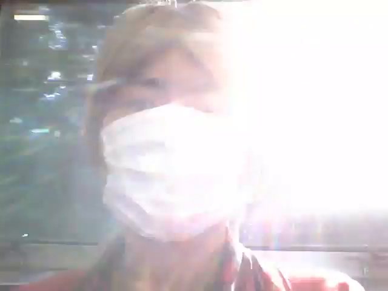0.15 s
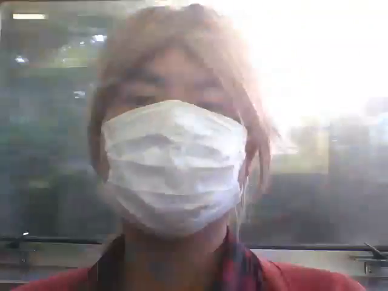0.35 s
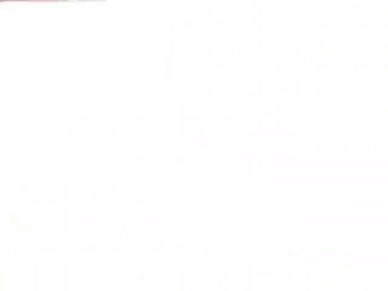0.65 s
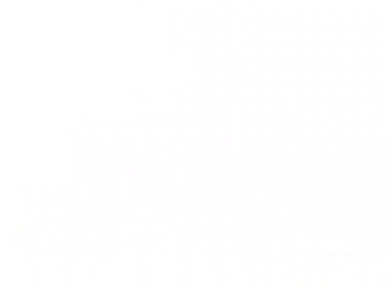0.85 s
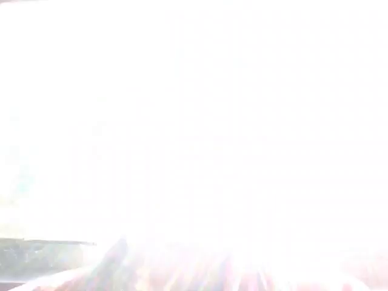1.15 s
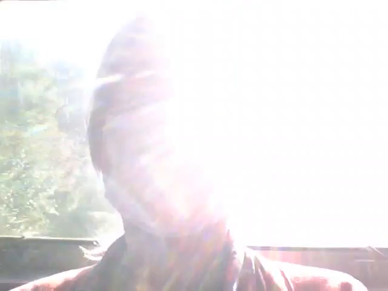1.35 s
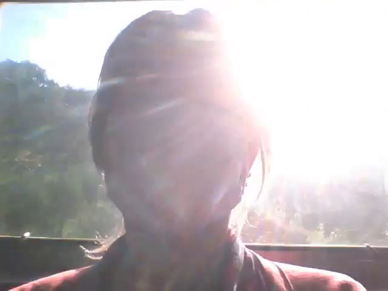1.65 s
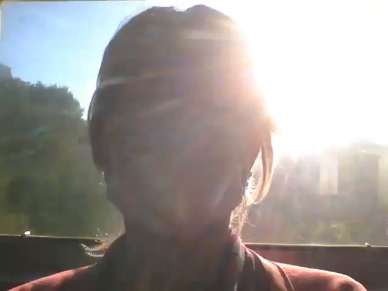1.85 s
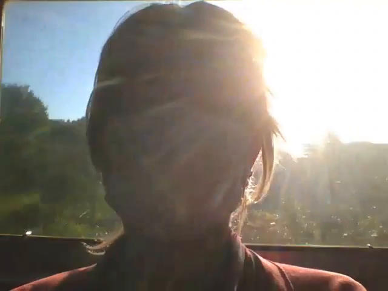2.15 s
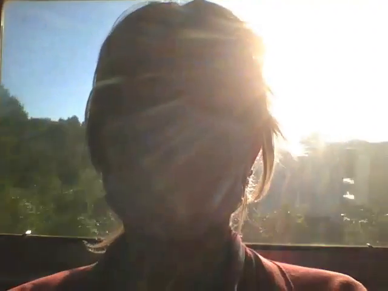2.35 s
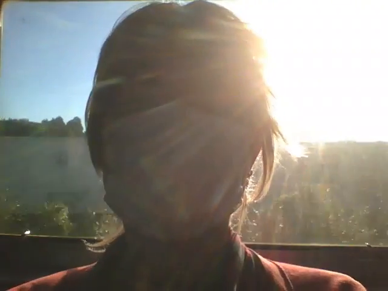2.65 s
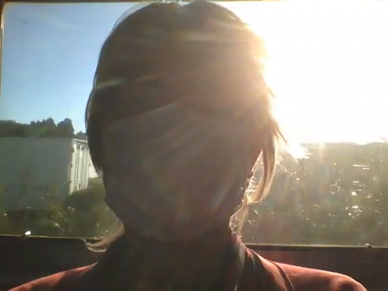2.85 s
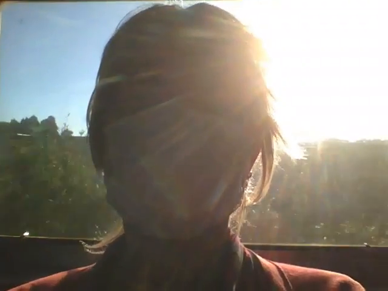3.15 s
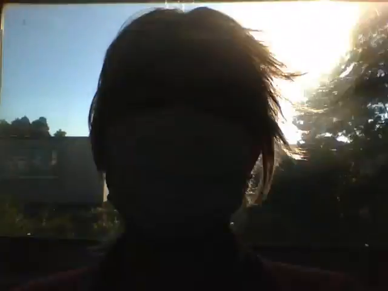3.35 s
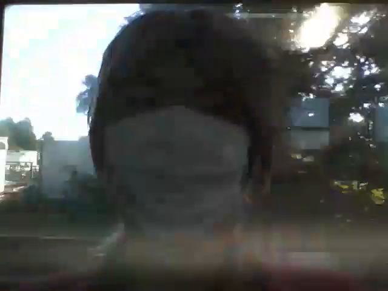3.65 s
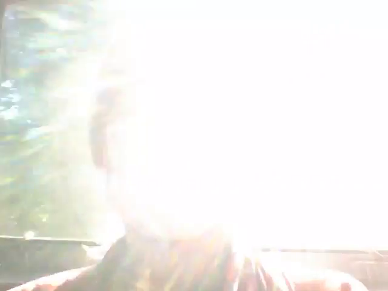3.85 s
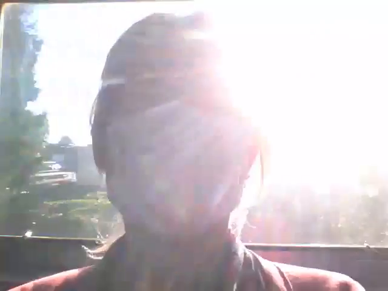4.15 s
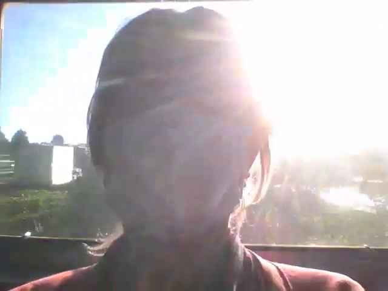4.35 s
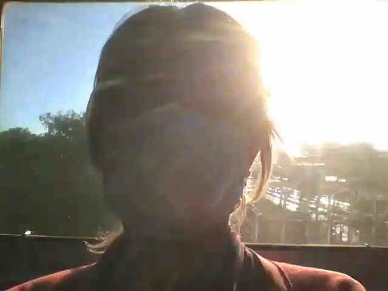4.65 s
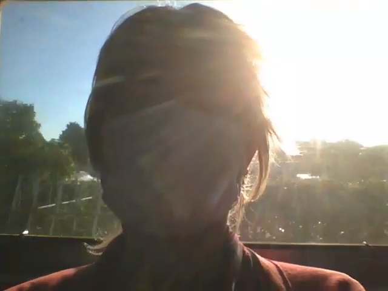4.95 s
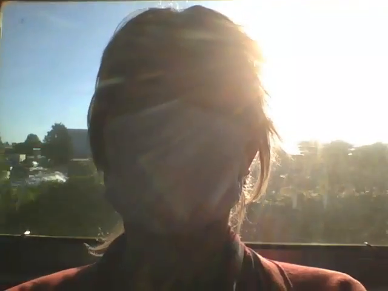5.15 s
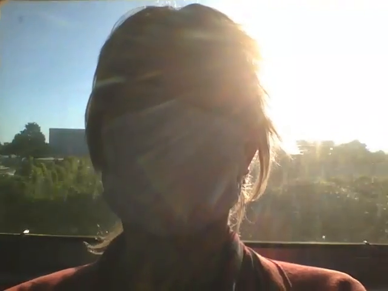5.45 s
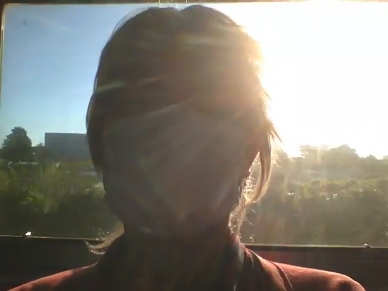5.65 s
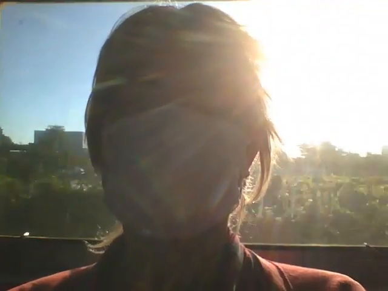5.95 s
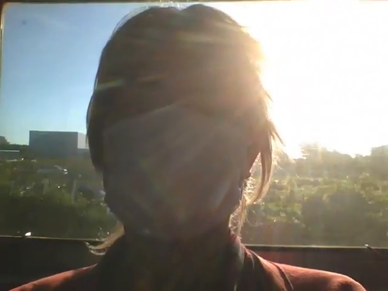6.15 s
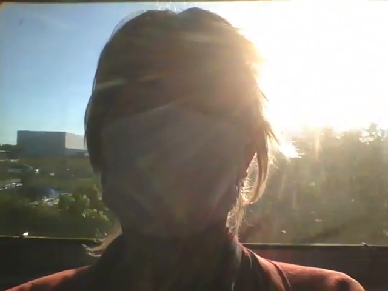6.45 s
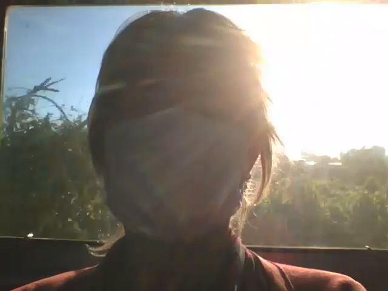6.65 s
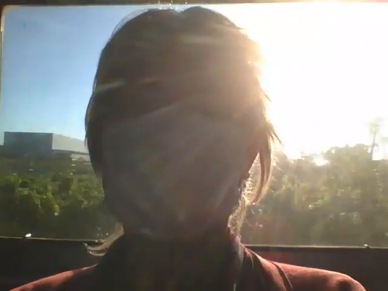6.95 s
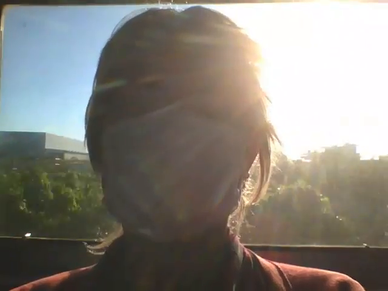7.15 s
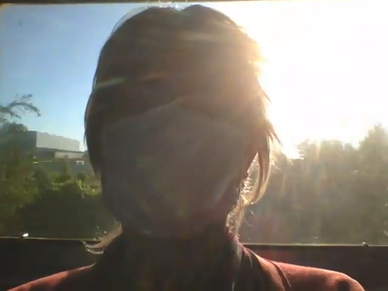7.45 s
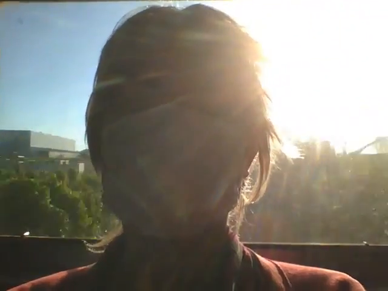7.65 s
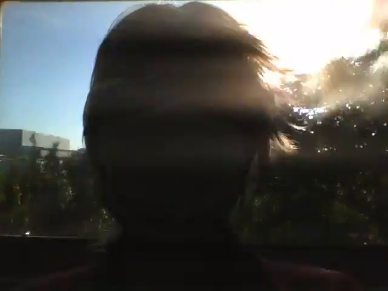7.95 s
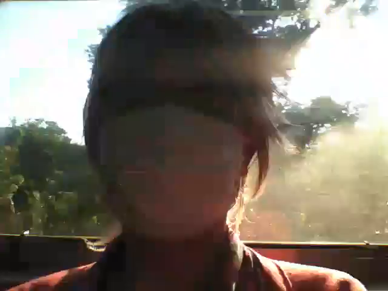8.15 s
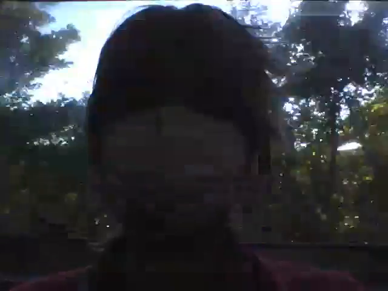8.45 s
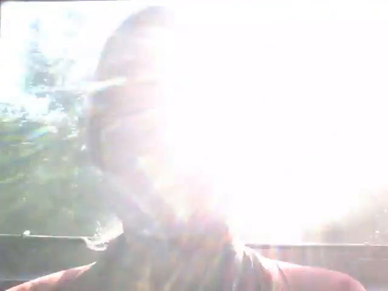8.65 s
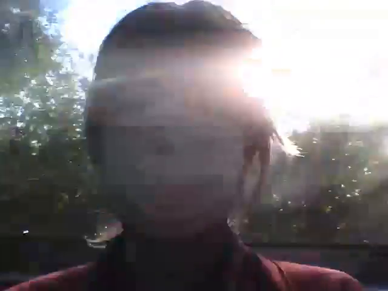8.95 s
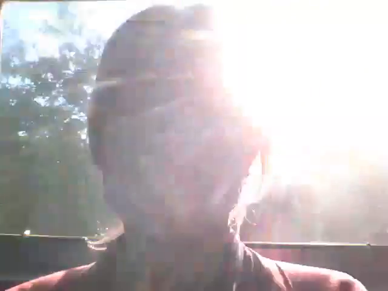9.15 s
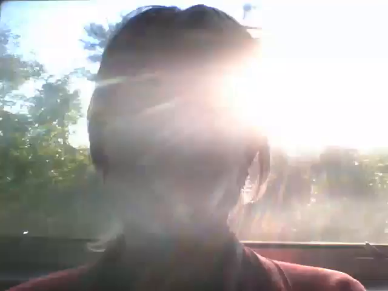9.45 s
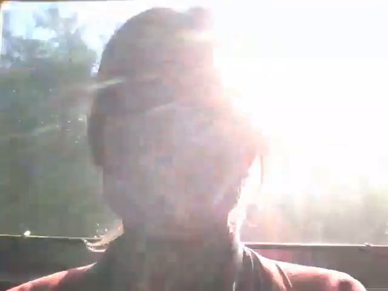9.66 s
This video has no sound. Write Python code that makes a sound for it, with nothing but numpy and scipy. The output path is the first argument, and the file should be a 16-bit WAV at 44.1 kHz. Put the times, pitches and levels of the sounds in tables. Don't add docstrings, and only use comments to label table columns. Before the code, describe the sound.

Inside a moving diesel railcar by an open window: a deep, lumpy boom, rolling wheel roar, irregular rail-joint knocks and hissing wind.

```python
import sys
import numpy as np
from scipy import signal
from scipy.fft import rfft, irfft
from scipy.io import wavfile
from scipy.ndimage import uniform_filter1d, minimum_filter1d

SR = 44100
rng = np.random.default_rng(int(sys.argv[2]) if len(sys.argv) > 2 else 0)


def field_ratio(decibels):
    return 10 ** (np.asarray(decibels, dtype=float) / 20)


def store_pcm(level_fs):
    pcm = np.round(np.clip(level_fs, -1, 1) * 32767).astype(np.int16)
    wavfile.write(sys.argv[1], SR, np.atleast_2d(pcm).T)


N = 432180


def unit(x):
    return x / np.sqrt(np.mean(x ** 2) + 1e-20)


def in_time(rows):
    s, *columns = np.transpose(rows)
    return [np.interp(np.arange(N) / SR, s, column) for column in columns]


def bumps(rows, column=1):
    out = np.zeros(N)
    for row in rows:
        span = max(int(row[2] * SR), 3)
        start = int(row[0] * SR) - span // 2
        where = np.arange(max(start, 0), min(start + span, N))
        shape = np.hanning(span) ** 0.98
        out[where] += row[column] * shape[where - start]
    return out


def drift(rate):
    coarse = 40
    r = np.exp(-2 * np.pi * rate * coarse / SR)
    noise = rng.standard_normal(N // coarse + 2002)
    slow = signal.lfilter([1], [1, -2 * r, r * r], noise)[2000:]
    return np.interp(np.arange(N) / coarse, np.arange(len(slow)), unit(slow - slow.mean()))


def resonate(x, hz, width_hz):
    r = np.exp(-np.pi * width_hz / SR)
    poles = [1, -2 * r * np.cos(2 * np.pi * hz / SR), r * r]
    return signal.lfilter(np.array([1, 0, -1]) * (1 - r * r) / 2, poles, x)


def resonant_noise(hz, width_hz):
    once = resonate(rng.standard_normal(N), hz, width_hz)
    return unit(resonate(once, hz, width_hz))


def coloured(spectrum, patchy_db, flicker_rate):
    hz, level_db = np.transpose(spectrum)
    grid = np.arange(N // 2 + 1) * SR / N + 1e-3
    shaped = rfft(rng.standard_normal(N)) * field_ratio(np.interp(np.log(grid), np.log(hz), level_db))
    place = 3 * np.log2(grid)
    out = 0
    for centre in range(int(3 * np.log2(hz[0])), int(3 * np.log2(hz[-1])) + 2):
        share = np.clip(1 - np.abs(place - centre), 0, 1)
        out = out + irfft(shaped * share, N) * field_ratio(patchy_db * drift(flicker_rate))
    return unit(out)


# centre in seconds, rise in dB, length in seconds.
TREES_PASSING = [
    (2.6, 14, 7.5),
    (3.62, 14, 0.68),
    (4.05, 7, .4),
    (6.49, 14, .28),
    (5.75, 6, .3),
]


def foliage():
    band = signal.butter(2, [5470, 7650], "band", fs=SR, output="sos")
    hiss = unit(signal.sosfilt(band, rng.standard_normal(N)))
    return field_ratio(-68.5 + bumps(TREES_PASSING)) * hiss


# frequency in Hz, density in dB per Hz.
AIR_SPECTRUM = [(2000, -14), (3400, -3.5), (4420, -0.5), (5940, -3), (6700, -7), (7950, -31), (10300, -56),
                (17500, -120)]


def window_air(roll_db, draught_db):
    return field_ratio(roll_db - 16.5 + draught_db) * coloured(AIR_SPECTRUM, patchy_db=1.0, flicker_rate=32)


# frequency in Hz, density in dB per Hz.
TRACK_SPECTRUM = [(820, 0.5), (1400, -0.5), (1520, -7), (1800, -2), (2380, -2), (3400, -9.5), (4420, -28),
                  (7480, -120)]


def track_noise(roll_db, draught_db):
    level_db = roll_db - 11 + 0.44 * draught_db
    return field_ratio(level_db) * coloured(TRACK_SPECTRUM, patchy_db=1.0, flicker_rate=17)


# start in seconds, pitch in Hz, level in dB.
FITTING_PINGS = [
    (1.535, 1790, -34),
    (3.775, 1705, -28),
    (5.545, 885, -30),
    (5.85, 3050, -38),
    (8.81, 2350, -36),
    (9.035, 2380, -35),
    (8.885, 1810, -36),
]


def pings():
    age = np.arange(int(.15 * SR)) / SR
    t60_s = 0.097
    out = np.zeros(N + len(age))
    for s, hz, db in FITTING_PINGS:
        envelope = field_ratio(db - 60 * age / t60_s) * np.tanh(age / .004)
        start = int(s * SR)
        out[start:start + len(age)] += envelope * np.sin(2 * np.pi * hz * age)
    return out[:N]


# time in seconds, level in dB.
HUM_LEVEL = [
    (0, -25),
    (3, -23),
    (4.5, -30.5),
    (6, -25.5),
    (7.2, -28),
    (8.5, -25),
    (9.8, -22.5),
]
# time in seconds, tonal share from 0 to 1.
HUM_TONAL_SHARE = [
    (0, .1),
    (7.2, .1),
    (8.6, .45),
    (9.8, .5),
]
# centre in seconds, rise in dB, length in seconds.
HUM_RISES = [(0.948, 6, 0.46), (2.38, 5.5, 0.15), (2.619, 3.5, 0.3), (3.053, 6, 0.18), (3.412, 8.5, 0.14),
             (5.268, 7, 0.35), (5.657, 6.5, 0.25), (7.503, 11.5, 0.32), (7.752, 12, 0.14),
             (8.396, 7.9, 0.3), (8.69, 9.6, 0.15), (9.034, 7, 0.45), (9.179, 2, 0.2), (9.439, 7, 0.41),
             (9.703, 4.5, 0.49)]


def hum():
    noise = resonant_noise(135.2, 22.2)
    swell = np.sqrt(uniform_filter1d(noise ** 2, int(.08 * SR)) + .15)
    wavering_hz = 134.5 * (1 + 0.0378 * drift(6.9))
    tone = np.sqrt(2) * np.sin(2 * np.pi * np.cumsum(wavering_hz) / SR)
    settled = np.clip(in_time(HUM_TONAL_SHARE)[0], 0, 1)
    mix = np.sqrt(1 - settled) * unit(noise / swell) + np.sqrt(settled) * tone
    return field_ratio(in_time(HUM_LEVEL)[0] + bumps(HUM_RISES)) * mix


# start in seconds, peak in dB, thud over clack in dB.
JOINT_KNOCKS = [(0.28, -22, -4), (0.377, -17, -6), (0.636, -26, -10), (0.805, -6, -8), (1.618, -19, -15),
                (1.757, -1, -17), (1.966, -22, -3), (2.758, -8, -3), (2.829, -14, 8), (2.896, -3, -7),
                (4.383, -15, -5), (4.763, -17, -4), (4.862, -17, -2), (5.234, -3, 2), (6.069, -17, -7),
                (6.398, -37, -20), (7.176, -27, -3), (7.307, -12, -6), (7.633, -23, -2), (8.061, -12, -13),
                (8.605, -27, -11), (9.063, -19, -4), (9.597, -14, -4), (9.663, -17, -5)]


def joints():
    age = np.arange(int(.15 * SR)) / SR
    clack_band = signal.butter(3, [700, 4000], "band", fs=SR, output="sos")
    thud_band = signal.butter(2, [150, 500], "band", fs=SR, output="sos")
    out = np.zeros(N + len(age))
    for s, db, thud_db in JOINT_KNOCKS:
        burst = rng.standard_normal(len(age))
        clack = unit(signal.sosfilt(clack_band, burst)) * np.exp(-age / 0.012) * np.tanh(age / 0.0017)
        thud = unit(signal.sosfilt(thud_band, burst)) * np.exp(-age / 0.0064) * field_ratio(thud_db - 9)
        start = int(s * SR)
        out[start:start + len(age)] += field_ratio(db - 18.5) * (clack + thud)
    return out[:N]


# frequency in Hz, density in dB per Hz.
ROAR_SPECTRUM = [(41, 2.5), (70, -7.5), (92, -4.5), (140, -7), (189, -10.5), (362, -9.5), (438, -15.5),
                 (715, -15), (819, -15), (977, -18.5), (1150, -18.5), (1490, -31), (1800, -30), (2340, -69),
                 (3960, -120)]
# frequency in Hz, width in Hz, dB over rolling.
FLOOR_RESONANCES = [(217.6, 19, -18), (251.6, 14, -20), (362, 8.5, -17.5), (609.3, 20, -17),
                    (821.7, 15, -19.5), (1042, 15, -21.5), (1113, 19, -18.5), (1171.5, 14, -21)]
# time in seconds, level in dB.
DEEP_SWELL = [(0, -23), (1.0, -23.5), (1.7, -26), (2.8, -18.5), (3.6, -22.5), (5.2, -24), (5.7, -21),
              (6.4, -26.5), (7.3, -19.5), (8.1, -25), (9.0, -23), (9.8, -22)]


def rolling(roll_db):
    rough = rng.standard_normal(N)
    roar = coloured(ROAR_SPECTRUM, patchy_db=0.26, flicker_rate=39)
    for hz, width_hz, db in FLOOR_RESONANCES:
        roar = roar + field_ratio(db + 1.66 * drift(8.5)) * unit(resonate(rough, hz, width_hz))
    deep = signal.sosfiltfilt(signal.butter(2, 400, fs=SR, output="sos"), roar)
    swell_db = in_time(DEEP_SWELL)[0]
    mean_db = roll_db.mean()
    deep_db = mean_db + 0.72 * (roll_db - mean_db) + .5 * (swell_db - swell_db.mean())
    return field_ratio(roll_db + 1.44) * (roar - deep) + field_ratio(deep_db + 3.5) * deep


# time in seconds, pitch in Hz, level in dB.
SHELL_TONE = [(0, 51.4, -8), (.5, 57.24, -14.5), (.8, 44.94, -14), (1.2, 51.97, -16.5), (1.65, 42.1, -10),
              (2.0, 51.75, -10), (2.5, 55.04, -15.5), (2.85, 54.96, -16), (3.05, 46, -15),
              (3.7, 50.86, -11.5), (4.1, 45, -11), (5.3, 47.9, -13), (5.55, 56.16, -14), (5.9, 45.85, -12),
              (6.9, 44, -14), (8.2, 49.92, -15), (8.65, 36.06, -15), (9.1, 53, -20)]
# centre in seconds, duck of the rest in dB,
# length in seconds, lift of the boom in dB.
SHELL_SWELLS = [(0.229, 3, 0.32, -1.5), (0.354, 6, 0.042, 5), (0.599, 6, 0.1, 4.5), (0.933, 3.5, 0.049, 4),
                (1.088, 3.5, 0.16, 8.5), (1.347, 5, 0.14, 3), (2.345, 5.5, 0.091, -0.5),
                (2.539, 4, 0.24, -1.0), (2.669, 6.5, 0.12, 1), (3.143, 4.3, 0.2, 2), (3.312, 4, 0.12, 7),
                (3.532, 5.5, 0.093, -2), (4.031, 2.5, 0.15, 3.0), (4.23, 2.5, 0.068, -3),
                (4.61, 1, 0.055, 9), (4.704, 6, 0.11, 2.5), (5.083, 4.5, 0.1, 4.0), (5.433, 2.5, 0.24, 0),
                (5.882, 4.5, 0.12, -1), (5.976, 0, 0.072, 10), (6.091, 0, 0.082, 17), (6.69, 1, 0.13, 2),
                (6.844, 3.0, 0.11, 0), (7.024, 2, 0.13, -1), (7.623, 4, 0.069, 0), (8.181, 3, 0.1, 4),
                (8.321, 1, 0.16, 3), (8.975, 1.7, 0.13, 5), (9.224, 2.3, 0.2, 2.5),
                (9.359, 4.5, 0.074, 3.5)]
# centre in seconds, loss in dB, length in seconds.
SHELL_LULLS = [(0.659, 6, 0.1), (0.978, 2.5, 0.14), (2.24, 2, 0.13), (2.789, 8, 0.29), (3.412, 6, 0.084),
               (4.111, 6, 0.1), (4.265, -0.5, 0.072), (4.784, 4, 0.11), (4.899, 9, 0.074), (5.218, 7, 0.1),
               (5.547, 2, 0.15), (5.742, 8, 0.2), (6.366, 2, 0.053), (6.54, 4, 0.14), (7.378, 11, 0.15),
               (7.688, 6.4, 0.14), (9.044, 4.6, 0.07), (9.134, 3.8, 0.07), (9.608, 7, 0.17)]


def boom():
    hz, level_db = in_time(SHELL_TONE)
    level_db = level_db + 1.36 * bumps(SHELL_SWELLS, column=3) - 2.4 * bumps(SHELL_LULLS)
    phase = 2 * np.pi * np.cumsum(hz * (1 + 0.0902 * drift(15.37))) / SR
    tone = np.sqrt(2) * np.sin(phase) * field_ratio(2.8 * drift(7.3))
    buffet = resonant_noise(35, 22)
    flutter = resonant_noise(58, 22.4)
    shell = field_ratio(level_db + 1.0) * unit(tone + 0.72 * buffet + 0.71 * flutter)
    swing = np.sqrt(uniform_filter1d(shell ** 2, int(.04 * SR)) + 1e-9)
    return shell / np.maximum(swing / field_ratio(-10.5), 1)


# time in seconds, rolling level in dB, draught at the window in dB.
RIDE_PACE = [
    (0, -19.5, 2.5),
    (1.0, -20.5, 2),
    (2.2, -19, 1),
    (3.6, -22, 2.5),
    (4.8, -20.5, 2),
    (6.3, -19, 0.5),
    (7.3, -18.5, -0.5),
    (8.4, -19, -2),
    (9.8, -17, -1.5),
]
# centre in seconds, rise in dB,
# length in seconds, extra draught in dB.
TRACKSIDE_GUSTS = [(0.03, 1, 0.19, 1.5), (0.309, 2.5, 0.063, -2), (0.434, 3, 0.12, 2),
                   (0.659, 10, 0.035, -2), (0.778, 4.5, 0.31, 1), (1.013, 3, 0.079, 5), (1.232, 3, 0.22, 1),
                   (1.457, 8.5, 0.21, -3.5), (2.255, 2.5, 0.12, 3.5), (2.41, 5, 0.065, 1.5),
                   (2.749, 3, 0.086, 2.5), (2.829, 0.5, 0.19, 1.5), (2.998, 4.5, 0.4, 0.5),
                   (3.228, 11, 0.078, -0.5), (3.417, 3.5, 0.071, -1.5), (3.632, 1.5, 0.069, 3),
                   (3.732, 3, 0.15, 3), (4.121, 3, 0.099, 0.5), (4.29, 3, 0.062, -1.0),
                   (4.41, 6, 0.14, 2.5), (4.829, 2.5, 0.28, -2), (4.904, 4.5, 0.07, 0),
                   (5.233, 4.6, 0.14, 2.5), (5.547, 3.5, 0.095, -3), (5.737, 2, 0.37, 4),
                   (6.475, 3, 0.3, 4), (7.698, 3, 0.14, -1), (8.835, 1.5, 0.19, 1.5),
                   (9.069, 3, 0.11, -0.5), (9.543, 2.5, 0.23, -1)]


def ride():
    roll_db, draught_db = in_time(RIDE_PACE)
    chatter_db = 0.93 * field_ratio(2.4 * (draught_db - draught_db.mean())) * drift(17.7)
    roll_db = roll_db + 0.65 * bumps(TRACKSIDE_GUSTS) - 1.1 * bumps(SHELL_SWELLS) + chatter_db
    return roll_db, draught_db + bumps(TRACKSIDE_GUSTS, column=3)


def scene():
    roll_db, draught_db = ride()
    outside = foliage() + window_air(roll_db, draught_db) + track_noise(roll_db, draught_db)
    inside = pings() + hum() + joints() + rolling(roll_db) + boom()
    return (outside + inside)[None]


def limit(x):
    ceiling_db, release_db_per_s, attack_s = -4, 166, 0.0013
    over_db = np.maximum(20 * np.log10(np.abs(x[0]) + 1e-9) - ceiling_db, 0)
    slope = release_db_per_s * np.arange(N) / SR
    held_db = np.maximum.accumulate(over_db + slope) - slope
    window = 2 * max(int(attack_s * SR), 2) + 1
    ahead_db = -minimum_filter1d(-held_db, window)
    return x * field_ratio(-uniform_filter1d(ahead_db, window))


def stretch(x):
    low_sr = 16000
    coarse = signal.resample(x[0], N * low_sr // SR)
    place = np.arange(N) * low_sr / SR
    lines = np.interp(place, np.arange(len(coarse)), coarse)
    steps = coarse[np.minimum(np.round(place).astype(int), len(coarse) - 1)]
    return (lines + 0.092 * (steps - lines))[None]


def band_limit(x):
    return signal.sosfilt(signal.butter(12, 14960, fs=SR, output="sos"), x)


def record(dry):
    limited = limit(dry * field_ratio(1.3))
    return band_limit(stretch(limited))


dry = scene()
out = record(dry)
store_pcm(out)
```